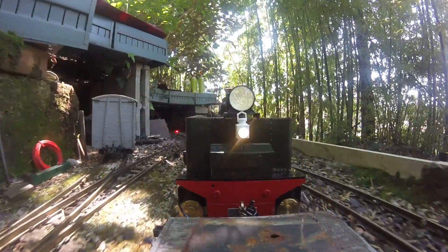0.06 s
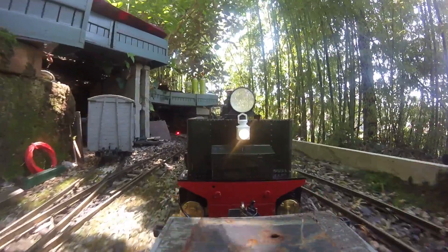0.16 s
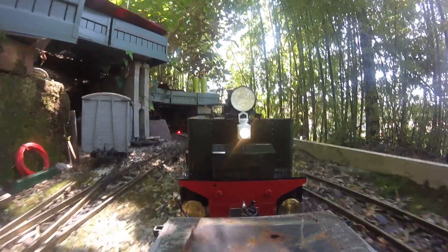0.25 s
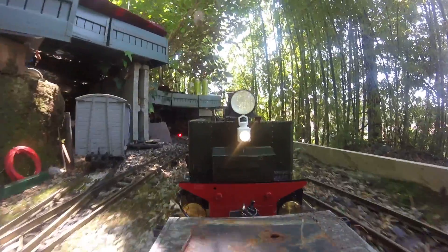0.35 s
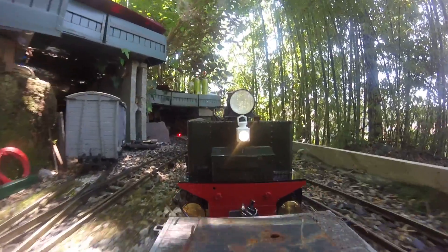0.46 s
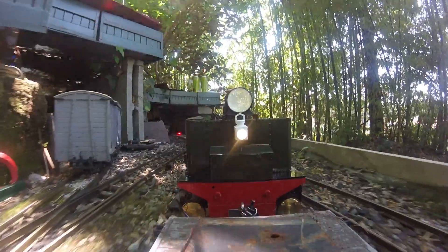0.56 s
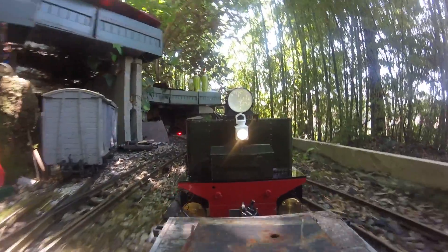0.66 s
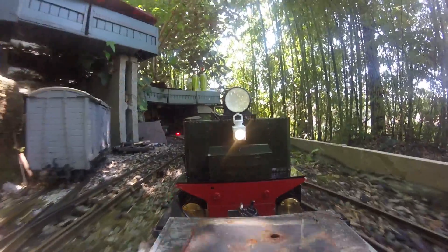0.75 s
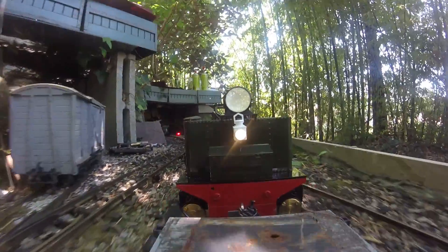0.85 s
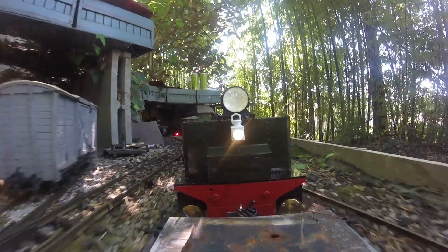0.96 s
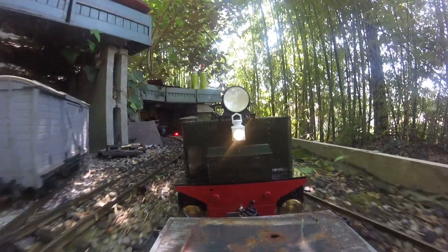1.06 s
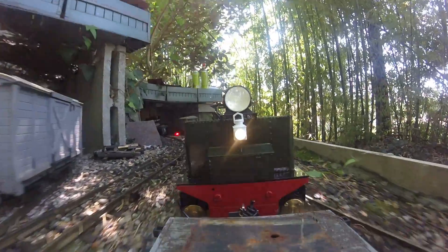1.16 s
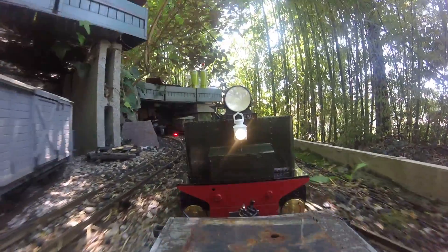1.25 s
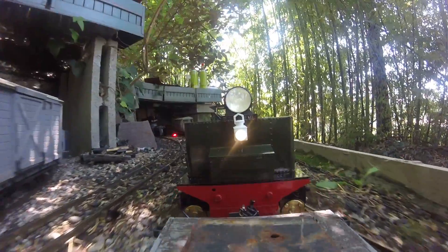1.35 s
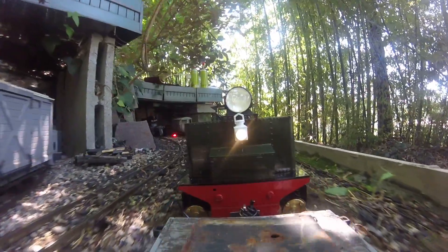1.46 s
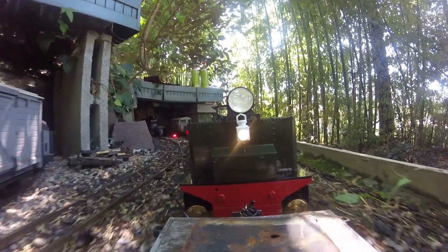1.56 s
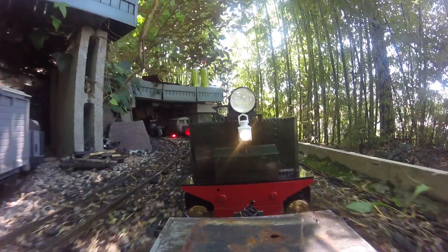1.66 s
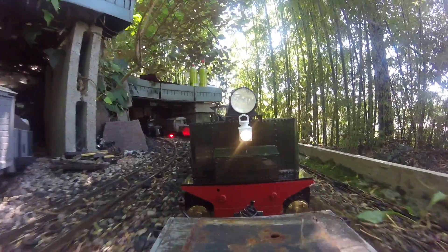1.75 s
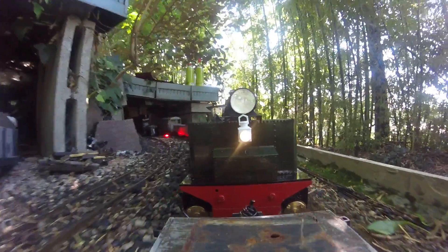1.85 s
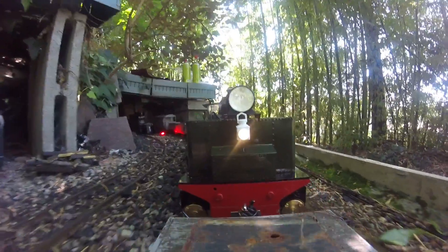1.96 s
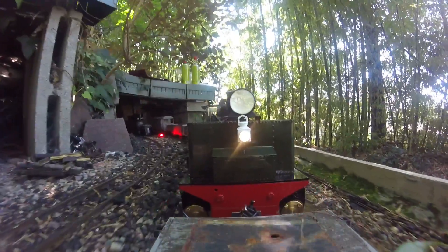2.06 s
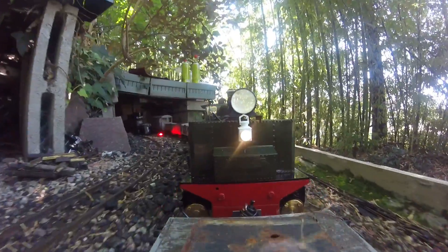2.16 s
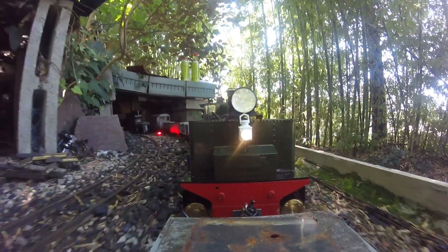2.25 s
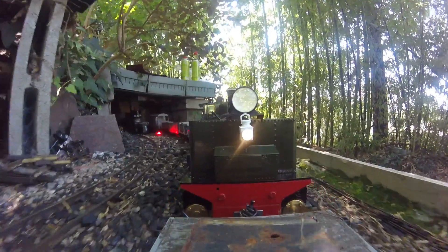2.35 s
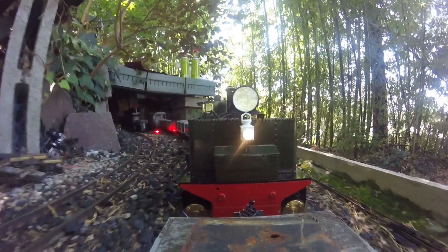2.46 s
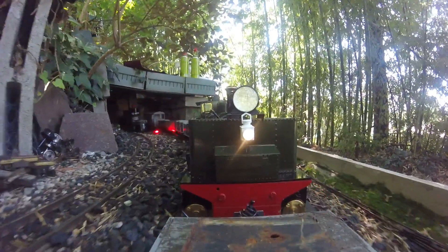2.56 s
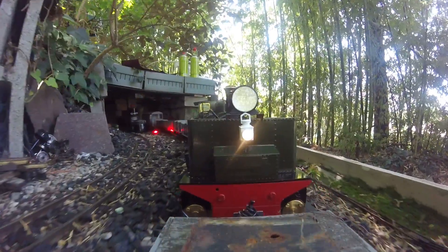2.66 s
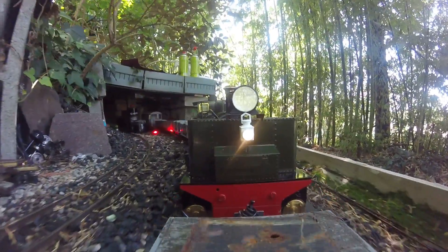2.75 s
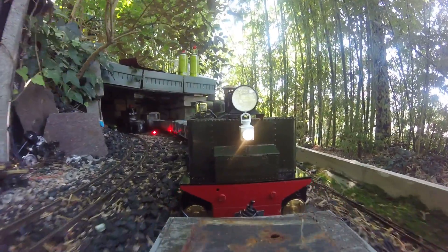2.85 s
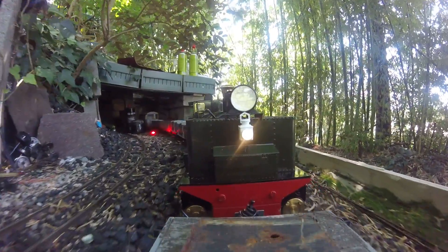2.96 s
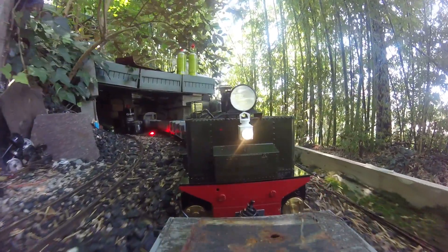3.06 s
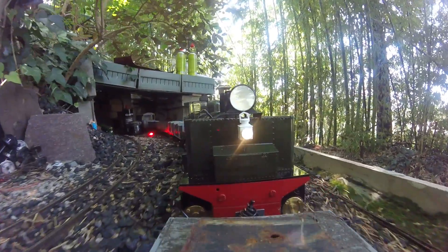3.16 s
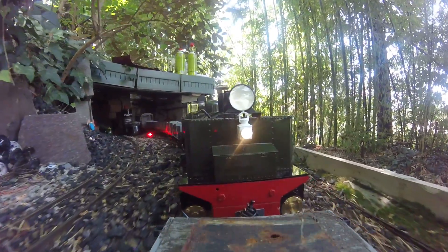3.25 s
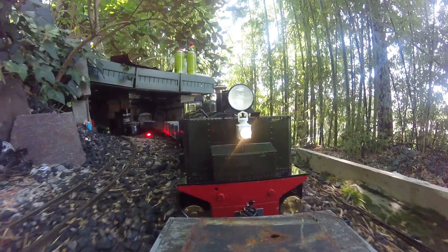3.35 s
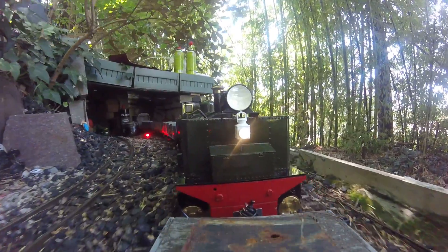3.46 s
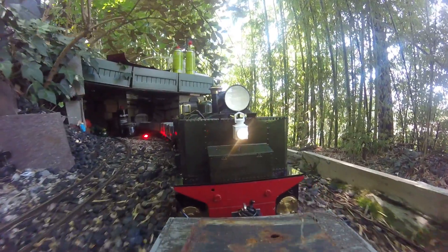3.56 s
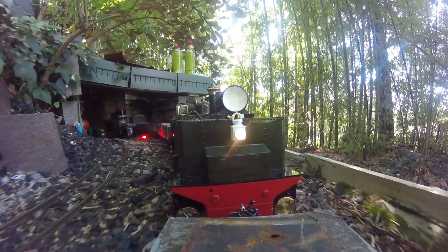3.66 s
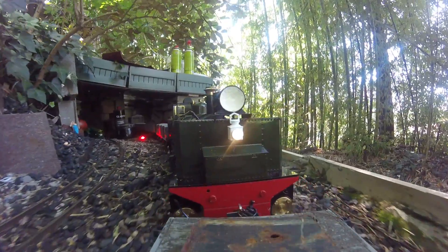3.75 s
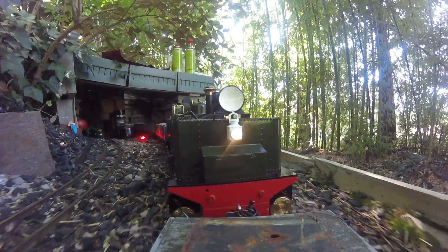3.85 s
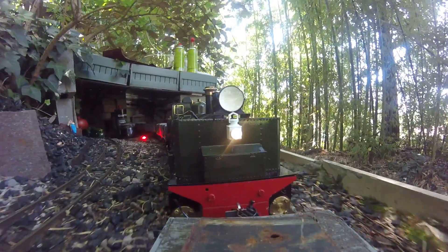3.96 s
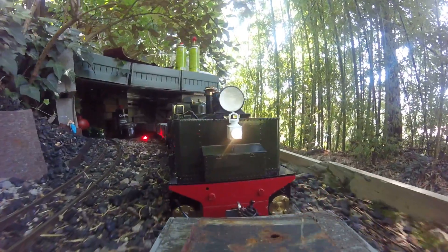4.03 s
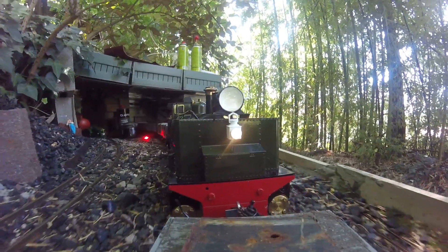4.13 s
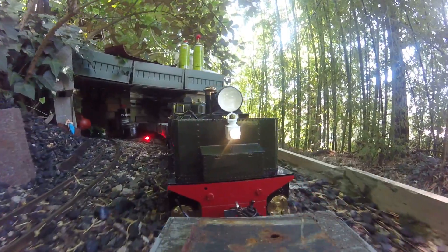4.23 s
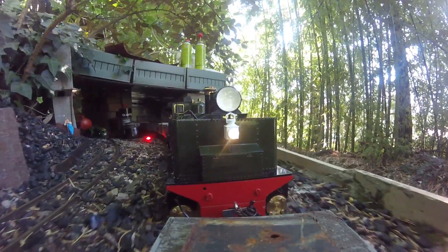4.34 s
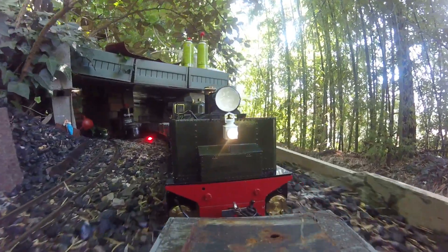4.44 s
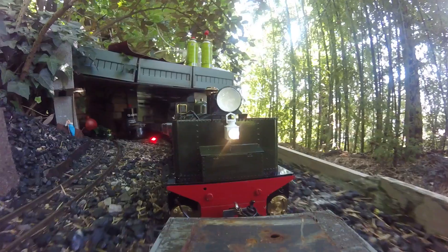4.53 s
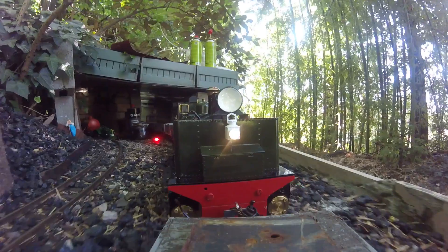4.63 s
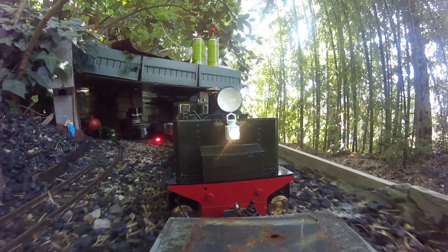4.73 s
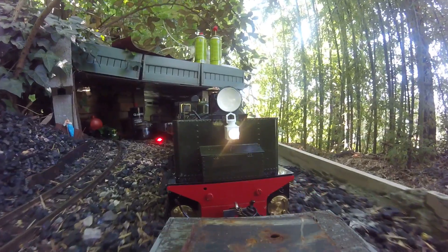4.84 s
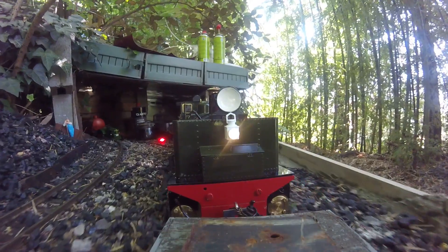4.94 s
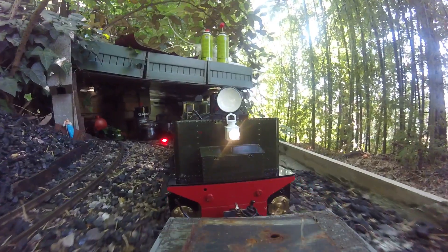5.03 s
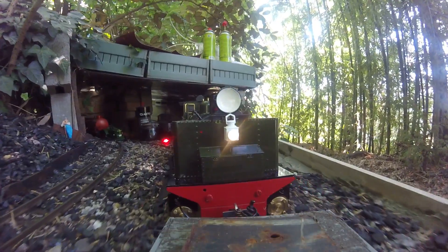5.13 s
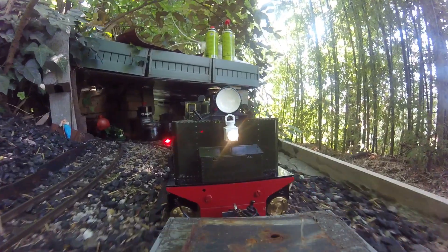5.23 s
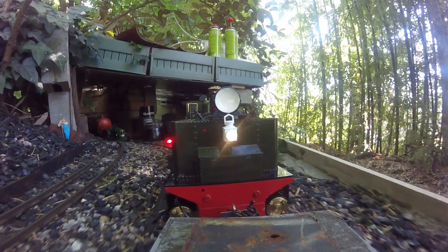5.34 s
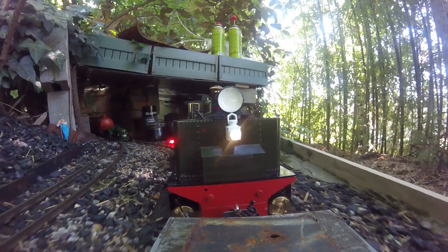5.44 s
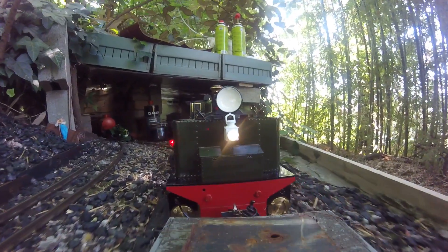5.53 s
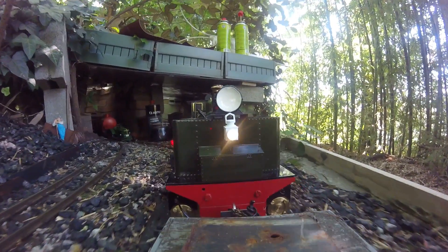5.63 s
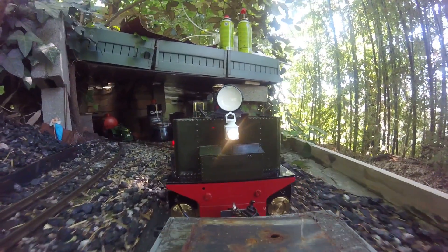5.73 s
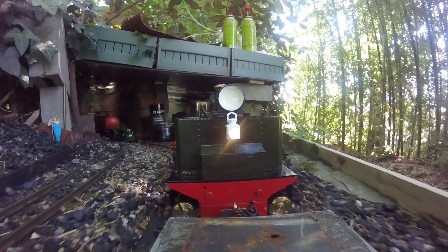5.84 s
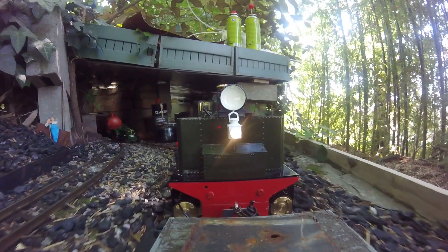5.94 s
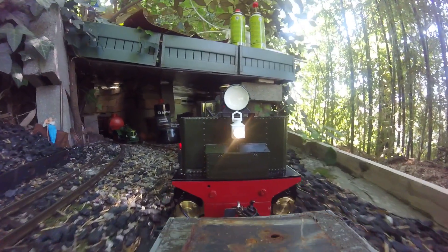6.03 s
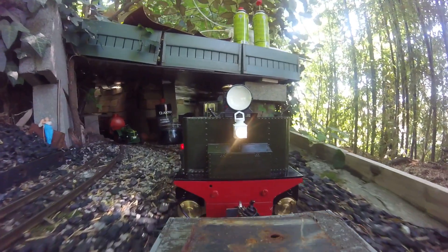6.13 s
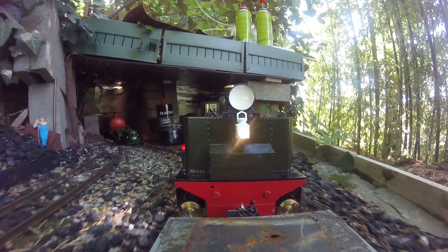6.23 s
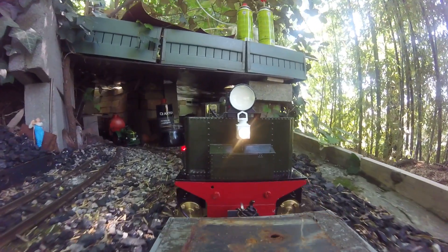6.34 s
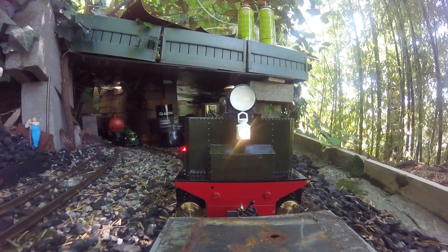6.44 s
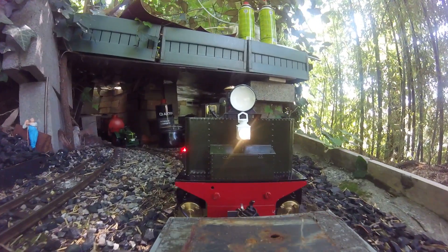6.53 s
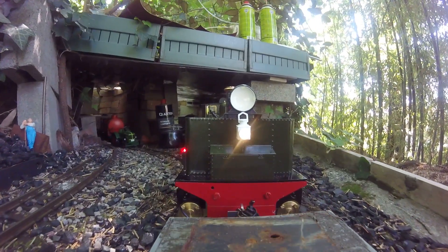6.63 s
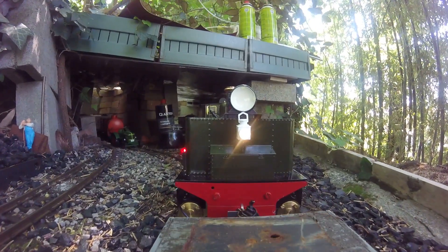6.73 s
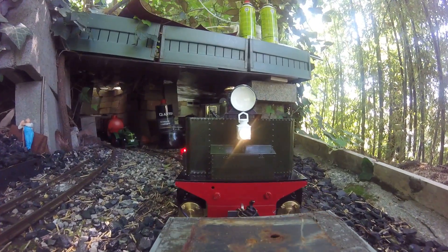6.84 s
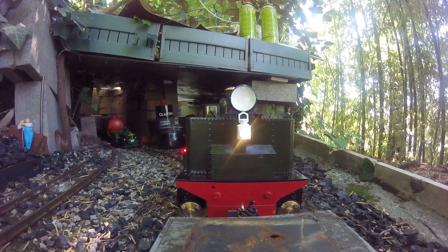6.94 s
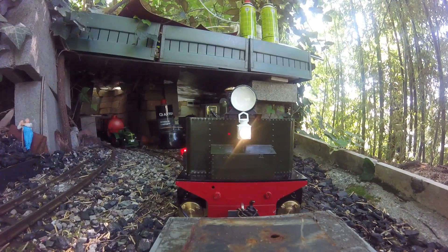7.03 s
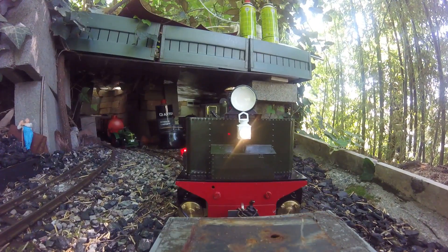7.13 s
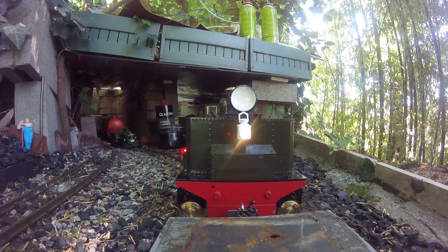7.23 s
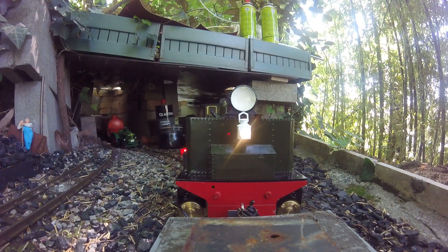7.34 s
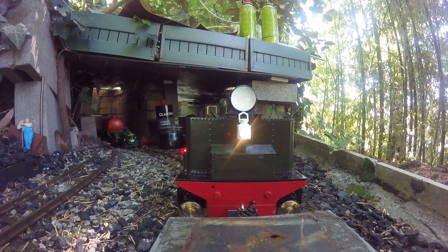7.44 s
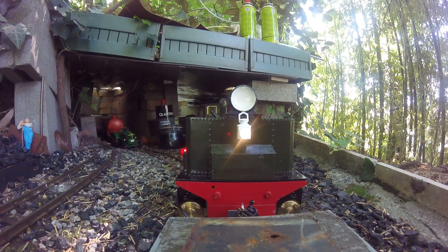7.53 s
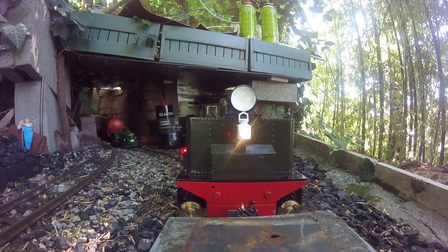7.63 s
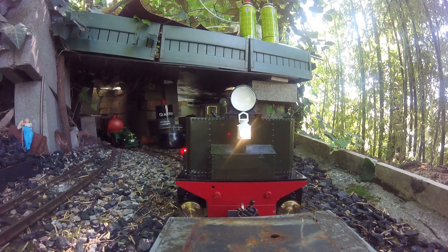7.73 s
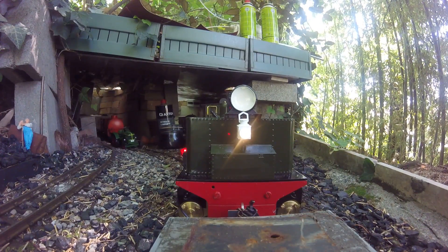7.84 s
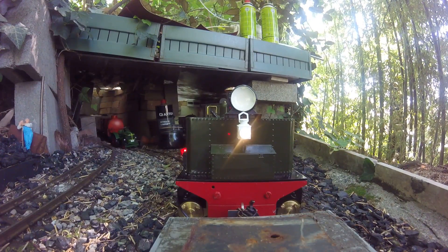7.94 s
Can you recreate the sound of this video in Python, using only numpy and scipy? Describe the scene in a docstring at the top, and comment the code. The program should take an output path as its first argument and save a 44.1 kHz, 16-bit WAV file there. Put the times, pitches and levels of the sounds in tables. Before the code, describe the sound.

A microphone shut inside a housing on a small garden train's wagon picks up rough rolling, boomy deck thumps and hard, dry clicks over rail joints. The clatter is dense for the first few seconds, with a brief steely ring at about two seconds. Later the wheel grind grows stronger, the wheels bite and lock past six seconds, a last knock and wobble follow, and only soft hiss and deep hum remain.

```python
"""A small garden train rolls over points and rail joints; a closed camera housing rides on its wagon.
From the start rough rail drives modes of wagon, deck, frame and housing, clicks ring, the deck thumps and swings.
Rubbing flanges (from 0.75 s), short tonal blips (1.6 s) and a loose steel link (2 s) add grit, pings and rings.
Just before 6.4 s the wheels bite harder, then lock; the last motion dies away by about 7.3 s.
Camera hiss, thin tones and a deep hum lie under it all and are left alone at the end."""
import sys
import numpy as np
from scipy.fft import rfft, irfft, next_fast_len
from scipy.io import wavfile
from scipy.ndimage import map_coordinates

SR = 44100
rng = np.random.default_rng(int(sys.argv[2]) if len(sys.argv) > 2 else 0)


def transcribe(u):
    """Save the signal u as a 16-bit wav file named by the first command-line argument.

    u: samples, shape (n,) or (channels, n), limited to [-1, 1]; the rate is SR.
    q: integer samples, one column per channel.
    """
    v = np.clip(np.atleast_2d(u).T, -1, 1)
    q = np.round(v * 32767).astype(np.int16)
    wavfile.write(sys.argv[1], SR, q)


N = 352346

# Rolling levels ahead of trims and flutter. Each row: time in seconds, then levels in dB of wheel grind,
# middle housing modes, deck rumble, wagon bounce, upper deck rumble (planks), frame drone.
ROLLING_LEVELS = [(0.0, -51, -65.5, -21.5, -23.5, -34.5, -42.5), (0.14, -51, -59.5, -30.5, -25, -42.5, -43),
                  (0.26, -46.5, -57, -28, -26.5, -30.5, -43.5), (0.39, -50, -58, -35.5, -27.5, -42, -47.5),
                  (0.53, -51.5, -61, -30.5, -33, -37, -52.5), (0.69, -49.5, -56.5, -31, -26, -35.5, -45.5),
                  (0.83, -48.5, -56, -27, -23, -34.5, -43), (0.93, -39.5, -53, -24, -30.5, -48, -41),
                  (1.1, -42, -55, -22.5, -25, -38, -40), (1.2, -43.5, -55, -27, -29, -33, -44),
                  (1.3, -48, -59.5, -34, -29, -34, -50.5), (1.46, -48.5, -54.5, -30.5, -23.5, -37.5, -44),
                  (1.57, -49.5, -57.5, -33.5, -33.5, -46.5, -51.5),
                  (1.73, -38, -51.5, -32, -30, -35, -46.5), (1.87, -43, -51, -36, -24, -39.5, -44),
                  (1.99, -56, -58, -36.5, -29, -38.5, -45.5), (2.13, -51.5, -62, -43.5, -27.5, -45.5, -52),
                  (2.34, -48.5, -61, -37.5, -27, -44, -50.5), (2.58, -52.5, -53, -33, -25.5, -43.5, -47),
                  (2.74, -44, -57.5, -30, -25.5, -32, -43.5), (2.88, -45, -54.5, -34.5, -29.5, -39, -41.5),
                  (3.01, -42, -49, -35.5, -24.5, -33.5, -40.5), (3.11, -40.5, -51, -34.5, -31, -36, -40.5),
                  (3.25, -40.5, -55.5, -36, -30, -35, -39), (3.41, -46.5, -52.5, -32.5, -30.5, -36, -44),
                  (3.6, -45, -57.5, -32, -38.5, -38, -41.5), (3.78, -43, -48.5, -31.5, -34, -38.5, -39),
                  (3.92, -40.5, -49.5, -30, -37, -39, -40.5), (4.04, -40, -51, -37.5, -26.5, -37.5, -42.5),
                  (4.19, -43.5, -48, -27.5, -31.5, -32.5, -36.5),
                  (4.31, -40, -48.5, -22.5, -25.5, -35.5, -35.5),
                  (4.53, -38, -48, -32.5, -33.5, -33, -38.5), (4.74, -35.5, -51, -25, -33, -33, -34.5),
                  (4.94, -37, -48.5, -29.5, -34, -36, -36.5), (5.06, -36, -49, -31, -28.5, -37, -38),
                  (5.39, -34.5, -49, -28.5, -29, -31.5, -37.5), (5.57, -40.5, -49, -33.5, -25, -37.5, -40),
                  (5.75, -37.5, -50, -31, -32, -32.5, -34.5), (5.9, -38, -46, -32, -30, -39, -39),
                  (6.0, -41, -48, -31.5, -23.5, -33.5, -36), (6.18, -40, -49, -42, -25.5, -33.5, -40.5),
                  (6.26, -35, -45.5, -34.5, -25.5, -29.5, -39.5),
                  (6.38, -48, -55.5, -44, -28.5, -37.5, -50.5), (6.46, -49, -58, -38.5, -29.5, -45.5, -56),
                  (6.67, -53, -65.5, -50, -39, -53.5, -51.5), (6.77, -55.5, -67, -57, -37, -55, -59.5),
                  (6.93, -64.5, -73, -70, -39.5, -68, -61), (7.1, -72, -76, -62, -49, -70, -72),
                  (7.3, -72, -73, -53, -50, -60, -71)]
# Knocks on the deck. Each row: peak in seconds, level in dB, pitch in Hz.
DECK_THUMPS = [(0.08, -16.5, 200), (0.155, -8.5, 169), (0.206, -6.5, 215), (0.248, -12.5, 178),
               (0.319, -14, 151), (0.394, -22, 130), (0.5, -24, 151), (0.566, -18.5, 145),
               (0.75, -10.5, 138), (0.769, -15, 165), (0.83, -15.5, 181), (0.925, -13, 182),
               (0.949, -10, 168), (1.076, -13, 173), (1.123, -6.5, 213), (1.153, -22.5, 161),
               (1.264, -13.5, 191), (1.445, -13, 158), (1.524, -10, 168), (1.898, -9.5, 166),
               (2.353, -18, 198), (2.479, -16, 181), (2.563, -14, 181), (2.941, -14.5, 192),
               (4.157, -11.5, 168), (4.2, -9.5, 187), (4.431, -12, 157), (4.665, -11.5, 156),
               (4.688, -26.5, 171), (4.703, -18.5, 180), (5.084, -13.5, 194), (5.147, -10.5, 157),
               (5.174, -9.5, 195), (5.228, -18, 208), (5.516, -9, 194), (5.549, -14, 162),
               (5.641, -11.5, 173), (5.916, -9, 183), (5.97, -23, 176), (6.041, -10.5, 169),
               (6.289, -16, 206), (6.483, -20, 194)]
# Modes of wagon frame and of housing (low, middle, high). Each row: centre in Hz, width in Hz, relative level in dB.
FRAME_MODES = [(318, 197, -3), (474, 125, -0.5), (641, 135, -1.5)]
LOW_MODES = [(752, 51, 5), (880, 115, 5), (971, 83, 5.5), (1052, 85, 0)]
MIDDLE_MODES = [(1403, 230, -0.5), (1740, 163, 2), (2000, 224, 1), (2610, 150, 1.5), (2880, 200, 0),
                (3187, 216, 0.5)]
HIGH_MODES = [(4040, 490, 0), (4650, 1200, -7), (7050, 1000, -12)]

HALT_S = 6.365  # the wheels lock
GRIND_REF_DB = -38  # layers that follow the grind by a share swing about this level


def amp(db):
    """Gain of a level in dB."""
    return 10 ** (np.asarray(db) / 20)


def unit(x):
    """x at rms 1."""
    return x / np.sqrt(np.mean(x ** 2) + 1e-20)


def curves(rows):
    """One value per sample for each column after the time."""
    s, *cols = np.transpose(rows)
    return [np.interp(np.arange(N) / SR, s, c) for c in cols]


def wobble(rate):
    """A smooth random curve, rate knots a second."""
    knots = rng.standard_normal(int(N * rate / SR) + 4)
    return map_coordinates(knots, [np.arange(N) * rate / SR])


def swells(s, db, width_s, t):
    """Sum of bell-shaped swells at the times t."""
    return amp(db) @ np.exp(-((t - s[:, None]) / np.reshape(width_s, (-1, 1))) ** 2)


def filtered(x, response):
    """x times a complex response of frequency."""
    m = next_fast_len(N + SR // 2)
    return irfft(rfft(x, m) * response(np.fft.rfftfreq(m, 1 / SR)), m)[..., :N]


def resonances(modes, edge_hz, sign=-1):
    """Response of modes with a steep roll-off, at unit mean power; sign 1: all start together, -1: alternate."""
    def response(f):
        ring = sum(sign ** k * amp(db) * 1j * f * w / (c * c - f * f + 1j * f * w)
                   for k, (c, w, db) in enumerate(modes))
        roll_off = (edge_hz ** 2 / (edge_hz ** 2 - f * f + 1.2j * f * edge_hz)) ** 2
        return ring * roll_off / np.sqrt(np.mean(abs(ring * roll_off) ** 2))
    return response


def ringing(x, modes, edge_hz):
    """x through a set of modes."""
    return filtered(x, resonances(modes, edge_hz))


def restless(x, modes, edge_hz, depth_db, rate):
    """x through modes whose alternate members swell and fade as two independent groups, at rms 1."""
    first = ringing(x, modes[::2], edge_hz) * amp(depth_db * wobble(rate))
    second = ringing(x, modes[1::2], edge_hz) * amp(depth_db * wobble(rate))
    return unit(first - second)


def grit(rate, spread_db, share):
    """Rough rail: smooth noise plus scattered specks of uneven size, which carry a share of the power."""
    specks = (rng.random(N) < rate / SR) * amp(spread_db * rng.random(N)) * rng.choice([-1, 1], N)
    share = np.clip(share, 0, 1)
    return np.sqrt(1 - share) * rng.standard_normal(N) + np.sqrt(share) * unit(specks)


def rolling():
    """Rough rail drives modes of wagon, deck, frame and housing; the load on the wheels flutters."""
    # Each row: centre in Hz, width in Hz, relative level in dB.
    bounce_modes = [(32.3, 17.7, 0), (45, 24.2, 3), (64.4, 48.7, -2.5)]  # wagon on its axles
    deck_modes = [(100.7, 26.5, -3.5), (138.4, 56.7, -1), (168, 43.8, -1)]  # slower deck modes
    plank_modes = [(198.5, 42.7, 0), (252, 58, -0.5)]  # faster deck modes
    bite_peak_db, bite_s, lock_s = 9.5, 0.072, .004  # harder bite before the lock: rise and release times
    rest_s, fade_db_per_s = 6.97, 25  # the last coasting dies away

    grind_db, middle_db, deck_db, bounce_db, plank_db, frame_db = curves(ROLLING_LEVELS)
    t = np.arange(N) / SR
    bite_db = bite_peak_db * np.exp(-abs(t - HALT_S) / np.where(t < HALT_S, bite_s, lock_s))
    grind_db, middle_db, frame_db = grind_db + bite_db, middle_db + bite_db, frame_db + bite_db
    shake, flutter = shudder(), wobble(30)
    high_db = -77.5 + 0.64 * (grind_db - GRIND_REF_DB) + 3.8 * shake

    rail = grit(rate=260, spread_db=17.0, share=0.42)
    far_rail = grit(rate=130, spread_db=13.0, share=0.55)  # the other wheels
    bumps = grit(rate=80, spread_db=13, share=0.5)

    bounce_gain = amp(bounce_db + 1.0 + 5.6 * shake + 0.72 * wobble(6.1) + 2.3 * wobble(16))
    bounce = bounce_gain * ringing(rng.standard_normal(N), bounce_modes, edge_hz=83.5)
    deck = amp(deck_db - 0.5 + 3.5 * shake + 1.9 * flutter) * ringing(bumps, deck_modes, edge_hz=202)
    planks = amp(plank_db + 1.5 + 2.7 * shake + 2.0 * flutter) * ringing(bumps, plank_modes, edge_hz=264)
    frame = amp(frame_db + 2.0 + 0.83 * shake + 1.4 * flutter) * ringing(rail, FRAME_MODES, edge_hz=590)
    low_gain = amp(grind_db + 1.5 + 2.0 * flutter + 0.55 * wobble(55) + 0.44 * wobble(16))
    low = low_gain * ringing(rail, LOW_MODES, edge_hz=1670)
    middle_gain = amp(middle_db + .67 * shake + 1.4 * flutter + 0.36 * wobble(14) + 1.4 * wobble(160))
    middle = middle_gain * restless(unit(rail + far_rail), MIDDLE_MODES, edge_hz=3120, depth_db=1.0, rate=66)
    high = amp(high_db + 2.0 * wobble(45)) * ringing(far_rail, HIGH_MODES, edge_hz=5800)
    fade = amp(-fade_db_per_s * np.maximum(t - rest_s, 0))
    return (bounce + deck + planks + frame + low + middle + high) * fade


def shudder():
    """0 to 1: how hard the deck shakes around its thumps."""
    t = np.arange(0, N / SR, .002)
    s, db, _ = np.transpose(DECK_THUMPS)
    shake = np.minimum(swells(s, db - db.max(), 0.038, t), 1)
    return np.interp(np.arange(N) / SR, t, shake)


def clicks():
    """Each click is a crackling blow of a few ms with a faint rattle after it, ringing all housing modes."""
    # Clicks: wheel on joint, plus a few thin treble ticks from overload. Each row: start in seconds,
    # middle modes in dB, low modes in dB over them, high modes in dB over them, favoured pitch in Hz.
    click_rows = [(0.012, -55, 16, -24, 1900), (0.04, -48.5, 15, -26, 1900), (0.0768, -42.5, 15, -20, 1900),
                  (0.1543, -43, 15, -19, 1910), (0.1633, -30, 11, -33, 2210), (0.201, -14.5, 2, -24, 2180),
                  (0.2065, -30, -4, -13, 2200), (0.211, -52, 3, 3, 2110), (0.22, -37, 11, -15, 2030),
                  (0.225, -54, -1, -11, 2300), (0.231, -30.5, -8, -12, 2270), (0.2416, -39, 11, -14, 2280),
                  (0.318, -39, 2, -7, 1850), (0.335, -23.5, 4, -19.5, 2170), (0.344, -34, -8, -5.5, 2200),
                  (0.365, -35, -5, -13, 2220), (0.4035, -38.5, 7, -14.5, 2350), (0.427, -42, 12, -40, 2180),
                  (0.5756, -33, 0, -12, 2000), (0.6804, -40, 10, -20, 1910), (0.706, -41.5, 18, -33, 1590),
                  (0.725, -36, -1, -28, 1930), (0.7414, -30, 4, -5, 2330), (0.7463, -17.5, -3, -14, 1750),
                  (0.761, -49, 0, -9, 2300), (0.7655, -31, 7, -33, 1860), (0.771, -44, 0, -8, 2400),
                  (0.7865, -33, 6, -9.5, 1960), (0.8011, -25.5, 10.5, -25, 2090),
                  (0.830, -44, 13, -20, 1900), (0.850, -41, 1, -23.5, 2000), (0.888, -48.5, 22, -25, 1900),
                  (0.9246, -33, -11, -21, 2200), (0.9446, -28.5, 10, -27, 2010), (0.961, -49, 9, -12, 2200),
                  (0.988, -46.5, 2.5, -11, 2100), (1.0626, -28, 9.5, -28, 1930),
                  (1.1213, -20, 8.5, -15.5, 2020), (1.1274, -20.5, 0, -30.5, 2130),
                  (1.152, -30.5, 10, -18, 2350), (1.1797, -43, 2, -18, 2140), (1.187, -33, 5.5, -26, 2020),
                  (1.208, -45, 17, -21, 2000), (1.2753, -27.5, 6.5, -24, 2560), (1.3697, -48, 6, -20, 2000),
                  (1.4418, -46, 17, -19, 1910), (1.519, -34, 13.5, -20, 2040), (1.589, -47, 4, -24, 2300),
                  (1.619, -43.5, 16.5, -26, 2000), (1.665, -41, 16, -26, 2300), (1.738, -43, 12, -26, 2400),
                  (1.779, -44.5, 14, -26, 2100), (1.8663, -34, 5, -38, 1990), (1.885, -33.5, 14, -12, 2130),
                  (1.892, -13, 3.5, -40, 2350), (1.898, -47, -1, -2, 2200), (1.9286, -20.5, -1, -31, 2140),
                  (1.9434, -28, -17, -28, 1780), (1.9672, -33, 10, -21, 1880),
                  (1.9822, -28.5, -9, -15, 2170), (1.9889, -33.5, 15, -30, 1790),
                  (2.0015, -29, 1, -18, 2110), (2.0046, -8.5, 1, -36, 2020), (2.0077, -26, 11.5, -24, 2400),
                  (2.0098, -14, 2, -22, 2390), (2.0155, -34, 11.5, -18, 2380),
                  (2.024, -19.5, -0.5, -19.5, 2130), (2.045, -45, 7, -22, 2190),
                  (2.066, -51, 17, -21, 1900), (2.075, -42, 11, -23, 2000), (2.0876, -37.5, 8.5, -26, 1900),
                  (2.126, -49, 14, -21, 1990), (2.1435, -25, 3.5, -45, 1920), (2.253, -44, 6, -27, 2650),
                  (2.352, -45, 9, -16, 2100), (2.3597, -29.5, 5.5, -27, 1840), (2.3696, -21, 11, -28, 2270),
                  (2.376, -44, 1, -29, 1980), (2.385, -26, 1, -26, 1800), (2.3887, -30, 2, -13, 2220),
                  (2.443, -44, -3, -20, 2500), (2.4766, -38, 4, -19, 2330), (2.494, -22.5, -2, -13.5, 2680),
                  (2.5606, -9, -8.5, -16, 1840), (2.6195, -56, 3, -26, 1800),
                  (2.6605, -38.5, 15.5, -21, 2420), (2.786, -43.5, 6, -20, 2500),
                  (2.885, -41, 9, -24, 2500), (2.908, -50, -1, -21, 2000), (2.9944, -39, -12, -23, 2100),
                  (3.0124, -34, 11, -32, 1780), (3.0355, -43, -4, -24, 2000),
                  (3.1627, -34.5, 13.5, -37, 1880), (3.3686, -40, -7, -24, 2230),
                  (3.408, -47, 19.5, -24, 2500), (3.567, -31, -1, -41, 2080), (3.6, -47, 19, -26, 2000),
                  (3.6375, -41, -2, -10, 2150), (3.7053, -32, 8.5, -23, 2190),
                  (3.771, -32.5, 6.5, -38, 2060), (3.8486, -28.5, 0, -24, 2000), (3.952, -34, 9, -31, 2030),
                  (4.1538, -21, 4.5, -34, 2500), (4.1611, -19, 6.5, -24, 1650),
                  (4.17, -15, -2, -22.5, 1740), (4.179, -40.5, 18, -18, 1880),
                  (4.2233, -28.5, 8.5, -21, 1800), (4.42, -33.5, 13.5, -10.5, 2130),
                  (4.578, -38.5, 18, -25, 1900), (4.697, -48, 9, -24, 2210), (5.029, -38, 0, -23, 2100),
                  (5.122, -34, 13, -25, 2100), (5.1726, -32, 5, -17, 1980), (5.369, -29.5, 4, -27, 2600),
                  (5.3898, -35.5, 18.5, -22, 2100), (5.4906, -23.5, 6.5, -17, 2210),
                  (5.5137, -14.5, 4, -30, 2300), (5.518, -32, 13, -8.5, 2230),
                  (5.5427, -25.5, 11, -19, 1800), (5.6416, -37, -2, -24, 2100),
                  (5.9627, -28, 6.5, -21, 2210), (5.997, -42, 5, -23, 2400), (6.0278, -31, 12, -30, 2000),
                  (6.0369, -13.5, -1.5, -36, 2570), (6.045, -31, 1, -17, 1910),
                  (6.0546, -26.5, -6, -15, 2240), (6.064, -28.5, 8, -16, 2140), (6.217, -42, -3, -26, 2400),
                  (6.2558, -36, 0, -31, 1860), (6.281, -33, 14.5, -24, 1810), (6.3421, -19, 1, -24, 1750),
                  (6.3469, -20, 9.5, -39, 1800), (6.35, -34, 5, -22, 1860), (6.357, -34, -5, -26, 2200),
                  (6.4787, -13, 4, -44, 2600), (6.4835, -45, 8, -30, 2280), (6.497, -28.5, 8.5, -31, 2400)]
    click_ms, softer_ms_per_db = 1.87, 0.06  # time scale of a -8.5 dB blow; weaker blows are longer
    body_db = -5  # frame's knock over the low modes
    first_impact = 6.6  # clean impact over the rms of the crackle
    mode_scatter_db = 2.5  # how unevenly one blow excites the modes

    out = np.zeros(N + SR)
    t = np.arange(4096) / SR
    f = np.fft.rfftfreq(len(t), 1 / SR)
    high = resonances(HIGH_MODES, edge_hz=7800)(f)
    body = resonances(widened(FRAME_MODES, 1.2), edge_hz=800)(f)
    hits = list(click_rows) + ticks()
    cracks = rng.standard_normal((len(hits), len(t)))
    scatter = mode_scatter_db * rng.standard_normal((len(hits), len(LOW_MODES) + len(MIDDLE_MODES)))
    for (s, db, low_db, high_db, hz), crack, luck in zip(hits, cracks, scatter):
        low_struck = [(c, w, level + d) for (c, w, level), d in zip(widened(LOW_MODES, 1.8), luck)]
        low = resonances(low_struck, edge_hz=1150, sign=1)(f)
        # the favoured pitch decides which middle modes answer most
        middle_struck = [(c, w, level + d - 14 * np.log2(c / hz) ** 2)
                         for (c, w, level), d in zip(widened(MIDDLE_MODES, 1.36), luck[len(LOW_MODES):])]
        middle = resonances(middle_struck, edge_hz=3250)(f)

        u = 1000 * t / np.maximum(click_ms - softer_ms_per_db * (db + 8.5), 1)
        rattle = amp(-28) * np.exp(-t / 0.0056)
        shape = np.minimum(t / 0.00039, 1) * (np.exp(-1.6 * u ** 0.71) + rattle)
        crack = crack + first_impact * (np.arange(len(t)) == np.argmax(shape))
        # body and low modes feel mostly the first impact
        early, whole = np.exp(-1.2 * u), np.ones_like(u)
        blows = shape * crack * np.array([early, early, whole, whole])
        groups = irfft(rfft(blows) * [body, low, middle, high], len(t))
        # every group takes its set share of the blow's energy
        groups *= np.linalg.norm(shape) / np.linalg.norm(groups, axis=1, keepdims=True)
        levels_db = db + np.array([low_db + body_db, low_db, 0, high_db])
        out[round(s * SR):][:len(t)] += amp(levels_db) @ groups
    return out[:N]


def widened(modes, factor):
    """A hard blow shakes the joints of the housing, which damps its modes more than rolling does."""
    return [(c, factor * w, level) for c, w, level in modes]


def ticks():
    """Specks and small gaps on the rail: weak clicks at random moments until the halt."""
    ticks_per_s, tick_db, spread_db = 32, -45, 1
    follows = 0.81  # share of the grind's swings that the ticks follow
    s = np.cumsum(rng.exponential(size=300)) / ticks_per_s
    grind_db = np.interp(s, *np.transpose(ROLLING_LEVELS)[:2]) - GRIND_REF_DB
    level, low, high, place = rng.standard_normal((300, 4)).T
    middle_db = tick_db + follows * grind_db + spread_db * level
    rows = zip(s, middle_db, 8 + 1.6 * low, -24 + 3.5 * high, 2080 + 170 * place)
    return [row for row in rows if row[0] < HALT_S]


def jolts():
    """Each jolt or thump is a short swing that builds fast and dies a little slower."""
    # Wheels drop, wagon swings out. Each row: peak in seconds, level in dB, pitch in Hz,
    # width in seconds (shape takes 0.55 of it before the peak, 0.7 after).
    wagon_swings = [(0.208, -12, 58, 0.0084), (0.242, -9, 53, 0.018), (0.321, -5.5, 50.6, 0.01),
                    (0.345, -4.5, 45.7, 0.012), (0.406, -7.5, 47.5, 0.013), (0.711, -10.5, 54, 0.004),
                    (0.753, -16.5, 69.4, 0.034), (0.811, -7, 56, 0.0087), (0.968, -29, 50.5, 0.04),
                    (1.105, -10, 44.7, 0.046), (1.143, -13, 66.7, 0.014), (1.473, -14, 52, 0.048),
                    (1.527, -10, 57, 0.016), (1.712, -12.5, 52.5, 0.011), (1.868, -11.5, 54, 0.026),
                    (1.904, -6, 56, 0.02), (1.973, -12.5, 57, 0.0089), (2.018, -7, 52.7, 0.013),
                    (2.067, -15, 58, 0.014), (2.115, -14, 56.6, 0.018), (2.425, -14.5, 61, 0.012),
                    (2.498, -14.5, 59.4, 0.035), (2.572, -2.5, 62.3, 0.011), (3.02, -12.5, 61, 0.015),
                    (3.087, -15, 58.4, 0.021), (3.418, -16, 60, 0.017), (3.568, -13.5, 57.4, 0.016),
                    (3.717, -12.5, 58.6, 0.025), (3.869, -17, 54.3, 0.041), (4.163, -12, 57.4, 0.0079),
                    (4.204, -11.5, 59, 0.053), (4.424, -10, 53.7, 0.042), (4.472, -15.5, 54, 0.066),
                    (4.728, -17.5, 56.5, 0.051), (4.976, -16, 60.4, 0.016), (5.179, -17.5, 53.7, 0.063),
                    (5.333, -16, 64.7, 0.063), (5.536, -11, 51.7, 0.025), (5.651, -18, 57.5, 0.028),
                    (5.783, -13.5, 57.7, 0.026), (5.958, -15.5, 68.5, 0.028), (6.056, -1.5, 50, 0.015),
                    (6.097, -12.5, 56.7, 0.0057), (6.291, -14, 53, 0.03), (6.371, -7, 47, 0.026),
                    (6.407, -14, 53.6, 0.013), (6.483, -13.5, 43, 0.038), (6.588, -21, 41, 0.026),
                    (6.712, -11, 48.3, 0.022), (6.778, -18, 46.7, 0.017), (6.839, -28, 51.4, 0.021),
                    (6.916, -26, 54, 0.031)]
    thump_width_s, thump_hz, stiffer = 0.0071, 162.2, 2.93  # width at this pitch; higher thumps are much shorter

    out = np.zeros(N + SR)
    t = np.arange(-SR // 8, SR // 4) / SR
    thumps = [(s, db, hz, thump_width_s * (thump_hz / hz) ** stiffer) for s, db, hz in DECK_THUMPS]
    swings = list(wagon_swings) + thumps
    turns = rng.random((len(swings), 1))
    for (s, db, hz, width_s), turn in zip(swings, turns):
        shape = np.exp(-(t / (width_s * np.where(t < 0, .55, .7))) ** 2)
        swing = amp(db) * shape * np.cos(2 * np.pi * (hz * t + turn))
        out[round(s * SR) + SR // 4 - SR // 8:][:len(t)] += swing
    return out[SR // 4:][:N]


def housing(x):
    """The shell between wagon and microphone cancels a few narrow bands."""
    # Where the housing hardly passes sound. Each row: centre in Hz, width in Hz, level in dB.
    dead_spots = [(696, 90, -3), (1580, 86, -2.5), (2300, 90, -3.5), (3310, 140, -6)]

    def dip(f, c, w, db):
        return (c * c - f * f + 1j * f * w * amp(db)) / (c * c - f * f + 1j * f * w)
    return filtered(x, lambda f: np.prod([dip(f, *spot) for spot in dead_spots], axis=0))


def scrapes():
    """A flange rubs the rail: short gritty swells in the treble."""
    # Each row: peak in seconds, level in dB, width in seconds.
    rubs = [(0.75, -70, 0.029), (1.12, -65, 0.031), (3.07, -71, 0.035), (4.17, -70, .03),
            (4.27, -62.5, .04), (5.1, -61, 0.014), (5.17, -57, 0.034), (5.53, -66, .03),
            (5.78, -60.5, 0.028)]
    # What a rubbing flange rings. Each row: centre in Hz, width in Hz, relative level in dB.
    flange_modes = [(3650, 500, 3.5), (5050, 580, -2), (7400, 700, -11)]
    rub = grit(rate=1000, spread_db=4.5, share=.35)
    return swells(*np.transpose(rubs), np.arange(N) / SR) * ringing(rub, flange_modes, edge_hz=8600)


def coupling():
    """Hard blows leave a rough steel ring that dies slowly; the link chatters, so level and phase flutter."""
    # A loose steel link rings. Each row: start in seconds, level in dB, t60 in seconds.
    link_rings = [(2.009, -51, 0.37), (2.028, -47.5, 0.41), (2.144, -58, 0.14), (2.373, -49.5, .2),
                  (2.39, -52, 0.37)]
    # Each row: pitch in Hz, relative level in dB.
    link_modes = [(1915, 5), (1986, -17.5), (1836, -10)]
    chatter_rad = 0.15

    out = np.zeros(N + SR)
    t = np.arange(SR // 2) / SR
    shaken = np.pad(chatter_rad * wobble(120), (0, SR))
    for s, db, t60_s in link_rings:
        at = round(s * SR)
        phase = shaken[at:][:len(t)]
        ring = sum(amp(level) * np.sin(2 * np.pi * hz * t + phase) for hz, level in link_modes)
        out[at:][:len(t)] += amp(db - 60 * t / t60_s) * ring
    return out[:N] * amp(1.1 * wobble(40))


def chirps():
    """Short tonal blips: each a slightly rising tone under a bell-shaped swell."""
    # Some in the treble, two low pings among the clicks.
    # Each row: peak in seconds, pitch at the peak in Hz, level in dB, width in seconds.
    blips = [(1.621, 2050, -49, 0.0036), (1.66, 2600, -48, .007), (1.705, 2550, -47, .004),
             (1.765, 1950, -50, .006), (1.795, 2600, -45, .004), (1.9915, 680, -25, 0.0027),
             (2.011, 755, -15, .002), (2.165, 1000, -42, .005), (5.06, 2100, -48, .004),
             (5.083, 2650, -47, .003), (5.125, 2050, -44, .003), (5.135, 2150, -43, .005)]
    rise_per_s = 12  # share of the pitch gained in a second
    out = np.zeros(N)
    t = np.arange(-1024, 1024) / SR
    for (s, hz, db, width_s), turn in zip(blips, rng.random((len(blips), 1))):
        tone = np.cos(2 * np.pi * (hz * t * (1 + rise_per_s * t / 2) + turn))
        out[round((s + t[0]) * SR):][:len(t)] += amp(db) * np.exp(-(t / width_s) ** 2) * tone
    return out


def camera():
    """Microphone and amplifier hiss, heavy in the bass, with thin tones that follow it and a deep hum."""
    # Hiss spectrum. Each row: frequency in Hz, relative density in dB.
    hiss_spectrum = [(6, -35.5), (12, -16.5), (35, -20.5), (52, -16.5), (70, -24.5), (95, -27), (200, -32),
                     (500, -43), (2000, -54), (5000, -60.5), (9000, -69), (11500, -74.5), (13000, -80.5),
                     (15500, -99)]
    # The floor creeps up and down. Each row: time in seconds, level in dB ahead of the hiss gain.
    floor_levels = [(0.0, -73), (0.42, -83), (1.91, -75.5), (2.07, -81), (3.16, -73), (7.99, -74.5)]
    # Camera electronics. Each row: pitch in Hz, level in dB over the floor level, ahead of trim and wobble.
    whine_lines = [(9600, -12.5), (9650, -21.5)]
    # Deep hum with two overtones. Each row: pitch in Hz, level in dB ahead of trim and wobble.
    hum_lines = [(24, -42.5), (48, -57.5), (72, -66.5)]

    hz, db = np.transpose(hiss_spectrum)
    noise = rng.standard_normal(N)
    hiss = unit(filtered(noise, lambda f: amp(np.interp(np.log(f + 1), np.log(hz), db))))
    t = np.arange(N) / SR

    def tones(lines):
        return sum(amp(level + 2.5 + 1.4 * wobble(6)) * np.sin(2 * np.pi * f * t) for f, level in lines)
    return amp(curves(floor_levels)[0]) * (amp(27.5) * hiss + tones(whine_lines)) + tones(hum_lines)


def scene():
    """The train as the housing feels it, over the camera's floor."""
    train = housing(rolling() + clicks()) + scrapes() + jolts() + coupling() + chirps()
    return (train + camera())[None]


def record(dry):
    """Big swings saturate softly; nothing passes above the band limit."""
    hardness, ceiling, top_hz = 5, .7, 15700
    saturated = dry / (1 + abs(dry / ceiling) ** hardness) ** (1 / hardness)
    return filtered(saturated, lambda hz: hz < top_hz)


dry = scene()
out = record(dry)
transcribe(out)
```